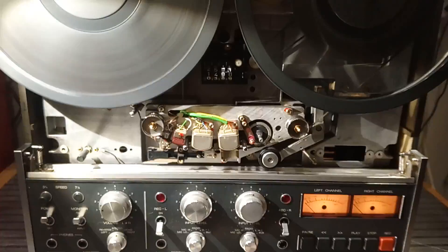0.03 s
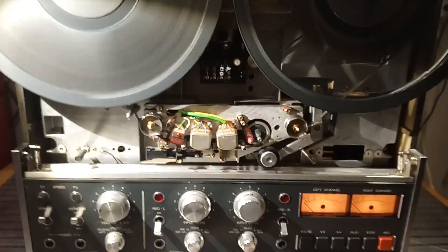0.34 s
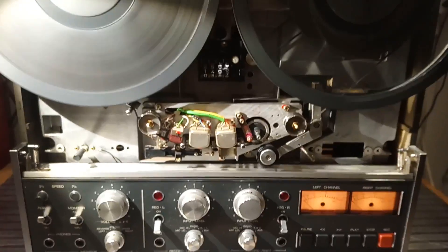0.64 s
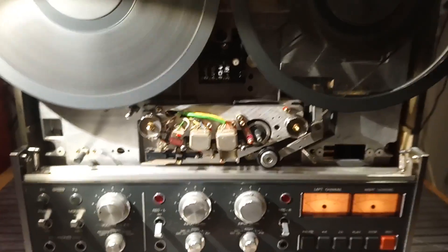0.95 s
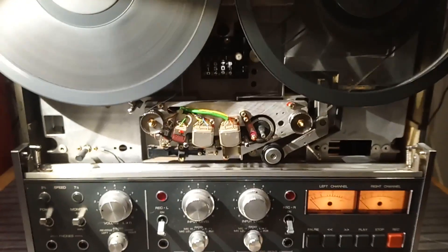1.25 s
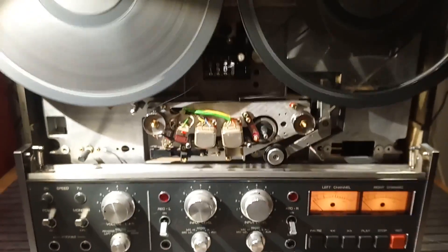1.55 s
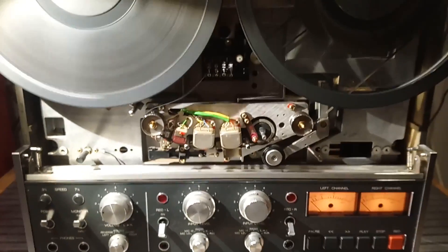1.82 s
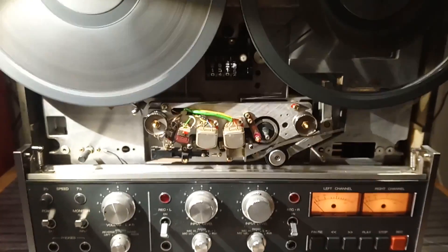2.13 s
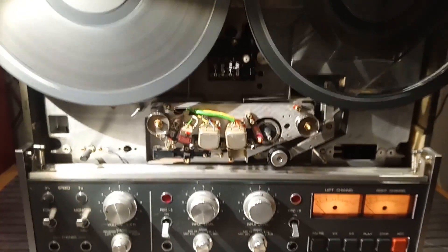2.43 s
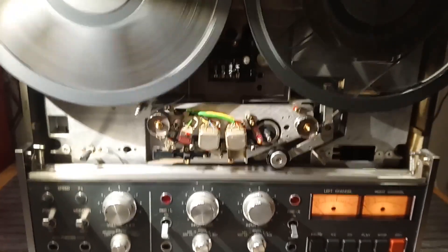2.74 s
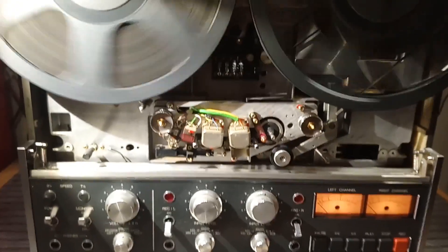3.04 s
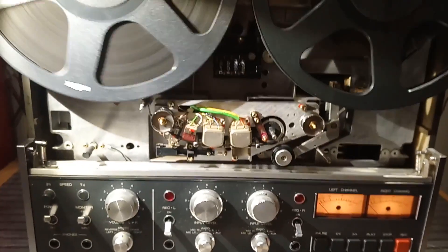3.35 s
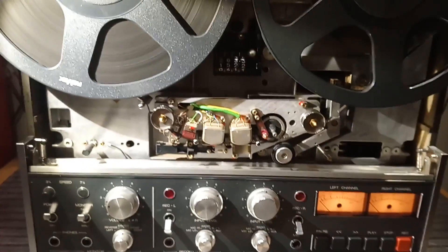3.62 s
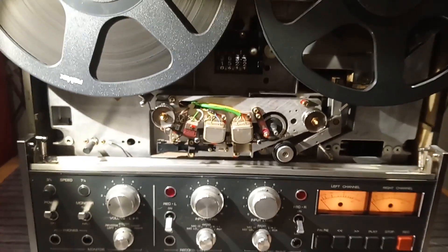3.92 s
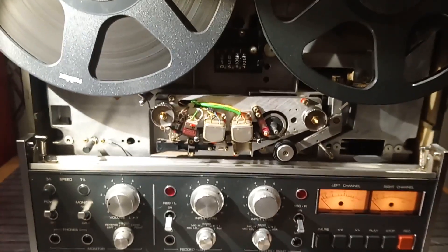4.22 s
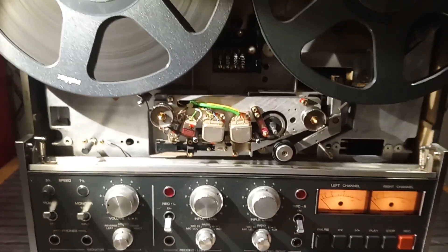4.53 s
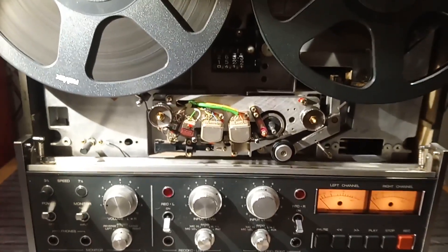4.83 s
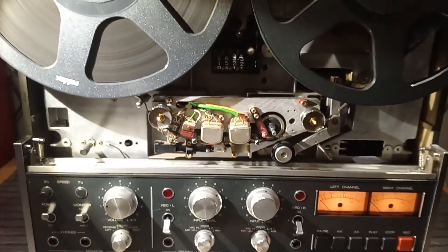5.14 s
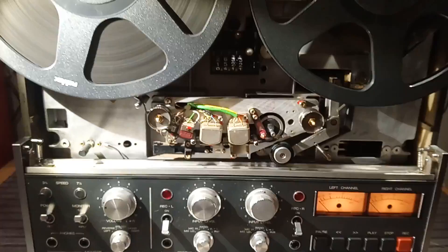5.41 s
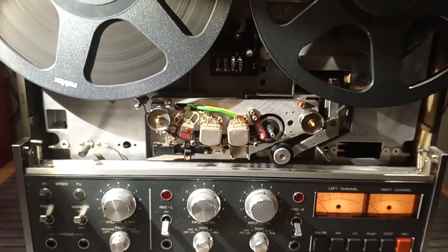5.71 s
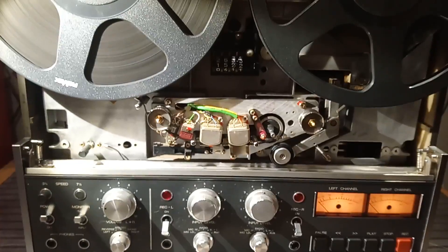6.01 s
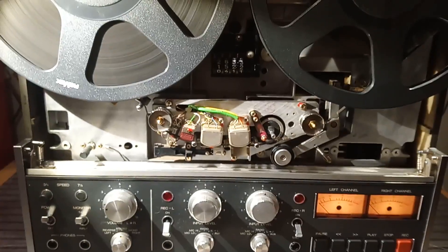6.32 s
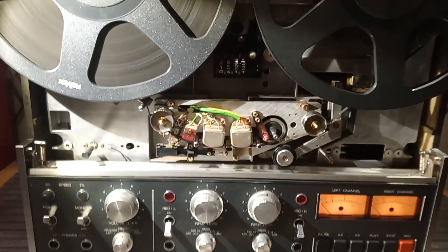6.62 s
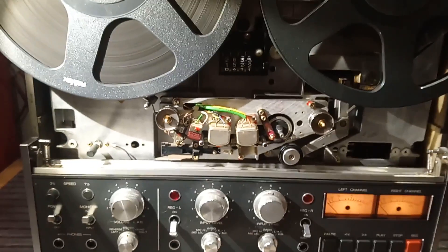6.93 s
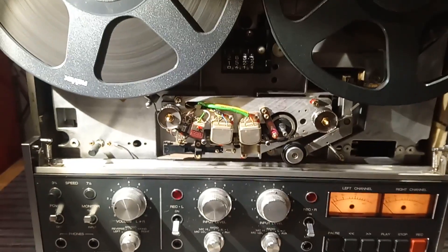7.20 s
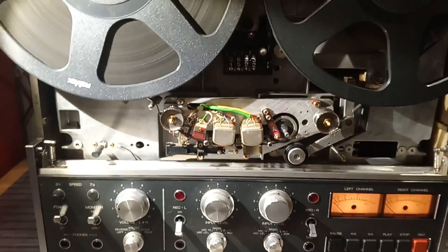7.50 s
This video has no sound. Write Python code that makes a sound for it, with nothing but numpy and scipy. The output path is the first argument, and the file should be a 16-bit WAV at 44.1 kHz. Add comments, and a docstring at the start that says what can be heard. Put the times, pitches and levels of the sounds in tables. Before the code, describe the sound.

Tape hisses through fast spinning reels until a sharp mechanical clunk; the reels brake to a halt, a metal arm clacks, and faint hum remains.

```python
"""Tape hisses as an open-reel machine winds at speed; the reels fan the air and the spooling motors throb.
A splice ticks past. The stop key snaps, solenoids and levers clatter, each impact exciting damped modes,
and the brakes drag with a thin ring of friction. Slack tape scrapes as the reels halt, a tension arm
clacks home, and only the capstan motor and the transformer hum on in a small room."""
import sys
import numpy as np
from scipy import signal
from scipy.fft import rfft, irfft
from scipy.io import wavfile
from scipy.ndimage import uniform_filter1d

SR = 44100
rng = np.random.default_rng(int(sys.argv[2]) if len(sys.argv) > 2 else 0)


def store_wav(level_fs):
    """Save 16-bit WAV to argv[1]."""
    pcm = np.round(np.clip(np.atleast_2d(level_fs), -1, 1) * 32767)
    wavfile.write(sys.argv[1], SR, pcm.T.astype(np.int16))


N = 333396
TIME, FREQ = np.arange(N) / SR, np.fft.rfftfreq(N, 1 / SR)
MAINS_HZ = 49.965
SPLICE_S, SLACK_S, POWER_OFF_S = .8406, 2.025, 2.14


def amp(db):
    """Amplitude ratio of a level in decibels."""
    return 10 ** (np.asarray(db) / 20)


def unit(x):
    """Normalisation to rms 1."""
    return x / np.sqrt(np.mean(x ** 2) + 1e-20)


def read(points, hz=FREQ):
    """Interpolation along a logarithmic frequency axis."""
    f, value = np.transpose(points)
    return np.interp(np.log(hz + 1), np.log(f + 1), value)


def curve(rows, column):
    """Amplitude envelope from a column of levels over time."""
    rows = np.asarray(rows)
    return amp(np.interp(TIME, rows[:, 0], rows[:, column]))


def release(s, fall):
    """Unity until time s, then exponential decay with time constant fall."""
    return np.exp(-np.maximum(TIME - s, 0) / fall)


def swell(s, width):
    """Gaussian pulse of height 1 centred on time s."""
    return np.exp(-((TIME - s) / width) ** 2)


def add(mix, s, sound):
    """Superposition of a sound starting at time s."""
    part = mix[..., round(s * SR):][..., :sound.shape[-1]]
    part += sound[..., :part.shape[-1]]


def drift(cutoff_hz):
    """Low-pass random fluctuation of rms 1."""
    slow = TIME[::32]
    hz = np.fft.rfftfreq(len(slow), slow[1])
    spectrum = rfft(rng.standard_normal(len(slow))) / (1 + (hz / cutoff_hz) ** 4)
    return np.interp(TIME, slow, unit(irfft(spectrum, len(slow))))


# Coherence of the two channels: f/Hz, correlation coefficient
COHERENCE = [(50, 0.3), (250, 0.7), (1000, 0.33), (2000, 0.17), (4000, 0.03), (15000, 0)]
def noise(gain):
    """Partially coherent noise in two channels, with spectral shape gain; their mean has rms 1."""
    a, b = rfft(rng.standard_normal((2, N)))
    same = read(COHERENCE)
    pair = irfft(np.array([a, same * a + np.sqrt(1 - same ** 2) * b]) * gain, N)
    return pair / pair.mean(0).std()


def uneven_friction(pair, patch_db, lift_db=lambda hz, s: 0):
    """Friction catches at shifting pitches, modulating noise in patches of about 200 Hz by 40 ms."""
    hz, s, spectra = signal.stft(pair, SR, nperseg=512, noverlap=384)
    patches = uniform_filter1d(rng.standard_normal(spectra.shape[1:]), size=3, axis=0)
    patches = unit(uniform_filter1d(patches, size=14, axis=1))
    gain = amp(patch_db * patches + lift_db(hz[:, None], s))
    out = signal.istft(spectra * gain, SR, nperseg=512, noverlap=384)[1][:, :N]
    return out / out.mean(0).std()


# Path of the tape-edge resonance: t/s, f/Hz, gain/dB
EDGE_PATH = [(.3, 5250, 6), (.6, 5370, 0), (1.05, 5330, 6), (1.2, 5230, -2.5), (1.35, 4570, 5.5),
             (1.55, 4370, 5), (2.0, 4570, 1)]
def edge_resonance(hz, s, width_hz=260):
    """The tape edge sings against a guide: a wandering resonance, as gain in dB over pitch and time."""
    at, centre, lift = np.transpose(EDGE_PATH)
    return np.interp(s, at, lift) / (1 + ((hz - np.interp(s, at, centre)) / width_hz) ** 2)


# Envelopes of the winding: t/s, relative hiss level/dB, relative rush level/dB
WINDING_LEVELS = [(0.4, -45, -56.5), (0.492, -46.5, -59.5), (0.8, -45.5, -60), (0.872, -44, -57.5),
                  (1.584, -46, -61), (1.878, -47, -62), (2.0, -47, -60.5)]
# Spectrum of tape on the guides: f/Hz, relative level/dB
HISS_SPECTRUM = [(650, -38.5), (1100, -18.5), (1270, -7.5), (1590, -20), (1850, -8), (2260, -13),
                 (3090, -7.5), (3940, -2.5), (5380, -0.5), (6570, -1), (8290, -12), (10900, -14),
                 (13700, -13.5), (14900, -1), (15600, -12)]
# Spectrum of air and bearings: f/Hz, relative level/dB
RUSH_SPECTRUM = [(25, -39.5), (55, -14.5), (100, -10), (150, -4.5), (230, -3), (300, -7.5), (380, -8.5),
                 (520, -5), (760, -10.5), (950, -6), (1100, -13.5), (1270, -9), (1900, -16.5), (3000, -44)]
def winding(reel_hz=11.2, sway_db=.5, spoke_db=.97, flutter_db=.13, wander_db=.68, gust_db=1.33):
    """Friction noise of tape, amplitude-modulated by the three-spoked reels, which also stir the air."""
    angle = 2 * np.pi * np.cumsum(reel_hz * (1 + .0294 * drift(2))) / SR
    sway = sway_db * (np.cos(angle) + np.cos(2 * angle)) + spoke_db * np.cos(3 * angle)
    tape = uneven_friction(noise(amp(read(HISS_SPECTRUM))), patch_db=2.5, lift_db=edge_resonance)
    tension = .15 + .83 * release(SLACK_S, .034)
    modulation = amp(1.5 + sway + flutter_db * drift(59.8) + wander_db * drift(10))
    hiss = tape * curve(WINDING_LEVELS, 1) * tension * modulation
    stir_db = 5 * (TIME > SPLICE_S) * release(SPLICE_S, .12)  # the splice briefly stirs the reels
    air = noise(amp(read(RUSH_SPECTRUM)))
    rush = air * curve(WINDING_LEVELS, 2) * amp(2.5 + stir_db + gust_db * drift(22))
    return (hiss + rush) * release(POWER_OFF_S, .037)


# Motor load, heard in the sixth harmonic: t/s, level/dB
MOTOR_LOAD = [(.4, -52), (.95, -51), (1.3, -55.5), (1.55, -56), (1.85, -50), (2.14, -51.5)]
# Other mains harmonics: harmonic number, level/dB
MOTOR_HARMONICS = [(2, -65.5), (4, -66.5), (8, -70.5), (10, -69.5)]
def spooling_motors(beat_hz=10.58, beat_peak_s=.418, depth=.7, whirr_db=-62, whirr_hz=378):
    """Mains harmonics; the sixth beats as the rotor slips against the field, until the power is cut."""
    mains = 2 * np.pi * MAINS_HZ * TIME
    beat = 1 + depth * np.cos(2 * np.pi * beat_hz * (TIME - beat_peak_s))
    throb = curve(MOTOR_LOAD, 1) * beat * np.sin(6 * mains + .15 * drift(25))
    hum = sum(amp(db + 1.4 * drift(5)) * np.sin(order * mains) for order, db in MOTOR_HARMONICS)
    whirr = amp(whirr_db) * noise(1 / (1 + ((FREQ - whirr_hz) / 22) ** 2))
    return np.sqrt(2) * (throb + hum + whirr) * release(POWER_OFF_S, .019)


# Partials of the capstan motor: f/Hz, relative level/dB, modulation depth
CAPSTAN_PARTIALS = [(46.4, -89, 0.3), (151, -77.5, .7), (198, -73.5, .3), (251, -77.5, .3),
                    (290, -84.5, 0.63), (343, -87.5, 0.38), (437, -91, .3)]
# Swells of the low hum: t/s, width/s, gain/dB
CAPSTAN_SWELLS = [(4.48, 0.096, 9), (5.07, .06, 7.5), (7.52, .15, 15)]
def capstan_motor(trim_db=-2, swell_hz=150, swell_width_hz=45):
    """Partials sound throughout with random amplitude and phase modulation; the low ones swell."""
    lift_db = sum(db * swell(s, width) for s, width, db in CAPSTAN_SWELLS)
    out = np.zeros(N)
    for hz, db, depth in CAPSTAN_PARTIALS:
        waver = 1 + depth * (drift(2.5) + 1j * drift(3.1))
        tone = unit((waver * np.exp(2j * np.pi * hz * TIME)).imag)
        out += tone * amp(trim_db + db + lift_db / (1 + ((hz - swell_hz) / swell_width_hz) ** 2))
    return out


def transformer(level_db=-68):
    """A transformer vibrates at twice the mains frequency."""
    return np.sqrt(2) * amp(level_db + .7 * drift(3)) * np.sin(2 * np.pi * 2 * MAINS_HZ * TIME)


# Spectrum of the background: f/Hz, relative level/dB
AMBIENT_SPECTRUM = [(20, -22.5), (50, -10.5), (100, -8.5), (200, -7.5), (550, -16), (1800, -21.5),
                    (2450, -21.5), (2720, -19), (3000, -22), (6200, -22.5), (8100, -33), (8900, -29.5),
                    (13200, -37), (15100, -21)]
def ambient_noise(level_db=-67.5):
    """Nearly stationary broadband noise, strongest in the bass."""
    return amp(level_db + .3 * drift(2.01)) * noise(amp(read(AMBIENT_SPECTRUM)))


# Spectrum of the splice tick: f/Hz, relative level/dB
SPLICE_SPECTRUM = [(500, -31), (1200, 1), (3000, -13), (4700, 10), (6500, -3), (8500, -35), (15000, -28)]
def splice(left_db=-17.5, right_lower_db=20, decay_s=.001):
    """A passing splice gives one dry transient; a level difference places it on the left."""
    t = TIME[:SR // 50]
    tick = noise(amp(read(SPLICE_SPECTRUM)))[:, :len(t)] * np.exp(-t / decay_s)
    out = np.zeros((2, N))
    add(out, SPLICE_S, tick * amp([[left_db], [left_db - right_lower_db]]))
    return out


# Soft low bumps: t/s, duration/s, f/Hz, peak level/dB
LOW_BUMPS = [(.885, 0.049, 74, -52), (2.2, 0.07, 159.6, -41.5), (2.23, .07, 48, -55),
             (2.243, .026, 258, -31), (3.66, .11, 52.1, -64)]
# Stick-slip squeaks: t/s, duration/s, f/Hz, peak level/dB
STICK_SLIP = [(2.1513, .009, 1840, -16), (2.1585, .0135, 1848, -7), (2.662, .023, 1835, -39),
              (2.805, .032, 1836, -44.5), (2.836, .014, 5210, -42), (2.862, .023, 1875, -42.5),
              (3.066, .023, 5470, -41), (3.166, .025, 4750, -34)]
def tone_bursts(rows, wobble):
    """Windowed tones with random frequency modulation of relative depth wobble."""
    out, unsteady = np.zeros(N), 1 + wobble * drift(303)
    for s, length, hz, db in rows:
        t = TIME[:round(length * SR)]
        cycles = hz * np.cumsum(unsteady[round(s * SR):][:len(t)]) / SR
        window = np.sin(np.pi * t / length) ** 1.5
        add(out, s, amp(db) * window * np.sin(2 * np.pi * cycles))
    return out


# Impacts of levers and reels: t/s, crack level/dB, thud level/dB, panel level/dB, panel f/Hz
IMPACTS = [(2.152, -25.5, -39.5, -29.5, 1265), (2.2104, -22, -30, -24.5, 228.4),
           (2.230, -30, -35, -29, 490), (2.2485, -24, -30, -23, 596), (2.3332, -20, -28.5, -21.5, 745),
           (2.348, -45, -38.5, -33.5, 229), (3.175, -37, -39, -41, 520), (3.2155, -34, -37.5, -42, 740)]
# Spectrum of ringing metal: f/Hz, relative level/dB
METAL_SPECTRUM = [(100, -46), (350, -22.5), (750, -7), (1200, -12.5), (1900, -6), (2500, -11.5), (3100, -7),
                  (3800, -10), (4400, -2.5), (5000, -7), (6700, -9), (8600, -25), (13000, -27.5),
                  (15200, -15)]
# Spectrum of the cabinet: f/Hz, relative level/dB
CABINET_SPECTRUM = [(25, -26.5), (60, -14), (130, -5.5), (250, -11), (450, 5.5), (800, 3), (1200, -16.5),
                    (2500, -47)]
def knocks(rise_s=.0011, crack_decay_s=.012, thud_t60=.0633, cabinet_width=.42):
    """Impacts excite dense metal modes and a damped thud: one panel mode amid the cabinet's many."""
    out, t = np.zeros((2, N)), TIME[:SR // 4]
    metal, body = noise(amp(read(METAL_SPECTRUM))), noise(amp(read(CABINET_SPECTRUM)))
    cabinet = body.mean(0) + cabinet_width * (body - body.mean(0))
    onset, damping = 1 - np.exp(-t / rise_s), 1000 ** (-t / thud_t60)
    for s, crack_db, thud_db, panel_db, hz in IMPACTS + rattle():
        now = slice(round(s * SR), round(s * SR) + len(t))
        crack = amp(crack_db) * np.exp(-t / crack_decay_s) * metal[:, now]
        thud = amp(thud_db) * cabinet[:, now] + amp(panel_db) * np.sin(2 * np.pi * hz * t)
        add(out, s, (crack + thud * damping) * onset)
    return out


# Strokes of sliding levers and slack tape: t/s, peak level/dB, rise time/s
SCRAPE_STROKES = [(2.160, -31, 0.014), (3.125, -41.5, 0.025), (3.171, -42, 0.0075)]
def scrapes(tape_db=-5):
    """Sliding friction swells and dies, mixing metal ringing with tape hiss."""
    envelope = np.zeros(N)
    for s, db, rise in SCRAPE_STROKES:
        age = TIME[:SR // 2] / rise
        add(envelope, s, amp(db) * age * np.exp(1 - age))
    metal, tape = noise(amp(read(METAL_SPECTRUM))), noise(amp(read(HISS_SPECTRUM)))
    return envelope * (metal + amp(tape_db) * tape)


# Modes of the stop linkage, brake lever and tension arm: f/Hz, relative level/dB, T60/s
LINKAGE_MODES = [(1212, -14.5, .35), (1421, -6, 0.11), (1813, 0, 0.23), (1850, -8, 0.16),
                 (2540, -14.5, 0.27), (3116, -10, 0.36), (3130, -14.5, 0.24), (4070, -11.5, 0.18),
                 (4360, -19.5, 0.32)]
LEVER_MODES = [(514, -2.5, 0.43), (762, 0, 0.47), (1350, 1, 0.1545), (1810, 4, 0.28), (3020, -5, 0.43),
               (4040, -9, .35), (5000, -4, .15), (6600, -9, 0.18)]
ARM_MODES = [(1140, -28.5, .24), (1370, -33, 1.4), (1805, -10.5, 0.34), (2007, -3.5, 0.15),
             (2320, -21, 0.24), (2635, -26, 0.52), (2830, -22.5, 0.37), (3079, -29, 0.46),
             (4000, -28, 0.22), (6126, -32, .35), (6670, -18.5, 0.14)]
def steel_strike(s, modes, ring_db, crack_db, crack_decay_s, contact_s=.000512):
    """Steel hits its stop: a bright crack, then free vibration of damped modes."""
    out, t = np.zeros((2, N)), TIME[:SR]
    contact = 1 - np.exp(-(t / contact_s) ** 2)
    for hz, db, t60 in modes:
        phase = np.array([[0], [rng.uniform(-.55, 1)]])  # each side receives the mode in its own phase
        envelope = amp(ring_db + db) * contact * 1000 ** (-t / t60)
        add(out, s, envelope * np.sin(2 * np.pi * hz * t + phase))
    bright = amp(read([(300, -50.5), (1200, -24.5), (1800, 8), (4000, 4), (6800, -2.5),
                       (9000, -28), (15000, -34)]))  # f/Hz, relative level/dB
    add(out, s, amp(crack_db) * np.exp(-t / crack_decay_s) * noise(bright)[:, :len(t)])
    return out


def rattle(start_s=2.271, gap_s=.0145, restitution=.69, crack_db=-28, loss_db=3,
           thud_db=-37, panel_db=-30.5, panel_hz=644):
    """Inelastic bounces of a lever, as impact rows: each is sooner and cracks less, over an equal thud."""
    bounces = []
    for k in range(4):
        s = start_s + gap_s * np.sum(restitution ** np.arange(k))
        hz = panel_hz * (1 + .1 * rng.uniform(-.961, 1))
        bounces.append((s, crack_db - loss_db * k, thud_db, panel_db, hz))
    return bounces


# Resonances of the brake bands: f/Hz, half-width/Hz, relative level/dB
BRAKE_RESONANCES = [(960, 48, -15), (1330, 33, -16), (1851, 38, -0.5), (3072, 39, -7), (4330, 100, -10),
                    (4600, 60, -9), (6537, 86, -13)]
# Spectrum of the slowing tape: f/Hz, relative level/dB
SLIDE_SPECTRUM = [(290, -51.5), (500, -25.5), (770, -28.5), (929, -12.5), (1070, -30), (1220, -6.5),
                  (1680, -16.5), (1850, -4.5), (2330, -20), (2980, -12), (4400, -8.5), (6770, -9.5),
                  (8400, -21.5), (13500, -21.5), (15600, -8)]
# The brakes grab and tug the tape: t/s, gain of the tape hiss/dB
BRAKE_GRABS = [(2.678, 5), (2.741, 5), (2.869, 6.5), (2.955, 4.5)]
def brakes(on_s=2.44, off_s=3.2, ring_db=-51.5, slide_db=-44, sag_db_per_s=9.5):
    """Friction on the drums drives the bands' resonances while the tape slows; each grab lifts both."""
    since = TIME - on_s
    bite = np.exp(np.minimum(since, 0) / .16)
    sag_db = sag_db_per_s * np.maximum(since, 0)
    grab_db = sum(db * swell(s, .02) for s, db in BRAKE_GRABS)
    power = sum(amp(db) ** 2 / (1 + ((FREQ - hz) / width) ** 2) ** 2
                for hz, width, db in BRAKE_RESONANCES)
    ring = noise(np.sqrt(power)) * amp(ring_db - sag_db + .2 * grab_db + 1.5 * drift(25))
    tape = uneven_friction(noise(amp(read(SLIDE_SPECTRUM))), patch_db=3)
    tape *= amp(slide_db - sag_db + grab_db + drift(50))
    return bite * (ring * release(off_s, .075) + tape * release(off_s, .15))


# Contacts as reels and guides settle: t/s, relative level/dB
SETTLING = [(3.534, -48.5), (3.687, -58.5), (6.230, -70), (6.279, -69), (6.475, -67), (6.530, -67)]
# Spectrum of a contact: f/Hz, relative level/dB
TICK_SPECTRUM = [(500, -30), (1900, -2), (3200, -15), (4900, 6), (6200, -1), (8000, -35), (15000, -42)]
def settling_ticks(rise_s=.0008, decay_s=.006):
    """Impacts of small parts, too light to excite the cabinet."""
    envelope, t = np.zeros(N), TIME[:SR // 8]
    for s, db in SETTLING:
        add(envelope, s, amp(db) * np.exp(-t / decay_s) * (1 - np.exp(-t / rise_s)))
    return envelope * noise(amp(read(TICK_SPECTRUM)))


def rustle(at_s=7.25, width_s=.16, peak_db=-75, low_hz=300, high_hz=6500):
    """Band-limited noise under a Gaussian envelope: one faint rustle in the room."""
    attenuation = (1 + (low_hz / (FREQ + 1)) ** 4) * (1 + (FREQ / high_hz) ** 10) * (1 + FREQ / 900)
    return amp(peak_db) * swell(at_s, width_s) * noise(1 / np.sqrt(attenuation))


# Reverberation time of the room: f/Hz, T60/s
ROOM_T60 = [(150, 0.68), (600, 0.28), (2000, 0.3), (6000, 0.28), (14000, 0.11)]
def reverberation(pair, first_echo_s=.004):
    """Convolution with sparse, partially coherent reflections; each band decays at its own rate."""
    size = SR // 2
    taps = rng.choice([-1., 1.], (2, size)) * (rng.random((2, size)) < .1) * (TIME[:size] > first_echo_s)
    hz, t, (a, b) = signal.stft(taps, SR, nperseg=256)
    same = read(COHERENCE, hz)[:, None]
    spectra = np.array([a, same * a + np.sqrt(1 - same ** 2) * b])
    tail = signal.istft(spectra * 1000. ** (-t / read(ROOM_T60, hz)[:, None]), SR)[1]
    return signal.fftconvolve(pair, tail / np.linalg.norm(tail[0]), axes=1)[:, :N]


# Balance of the running deck, the impacts and the background: f/Hz, left minus right level/dB
DECK_BALANCE = [(60, 0), (92, -3), (140, -3.5), (210, -0.5), (330, -1.0), (500, -3.5), (770, -1.0),
                (1170, -1), (1790, -1.5), (2740, -0.5), (4190, 0.5), (6410, -4.5), (9810, -20),
                (15000, -13.5)]
IMPACT_BALANCE = [(60, -2.5), (120, -3), (240, 1.5), (480, -1.5), (950, -1), (1890, -2.5), (3770, 0.5),
                  (7520, -10), (15000, -16)]
AMBIENT_BALANCE = [(60, -7.5), (130, -3.5), (290, -1.5), (640, -1), (1410, -1), (3100, -0.5), (6820, -2.0),
                   (15000, -3.5)]
def pan(pair, balance):
    """Constant-power panning, frequency by frequency."""
    lean = amp(np.outer([.5, -.5], read(balance)))
    return irfft(rfft(pair) * lean / np.sqrt(np.mean(lean ** 2, axis=0)), N)


def scene():
    """Superposition of the running deck, its impacts with their reflections, and the quiet room."""
    clatter = knocks() + scrapes() + settling_ticks()
    clatter += steel_strike(2.3338, LEVER_MODES, ring_db=-46.5, crack_db=-34, crack_decay_s=.013)
    linkage = steel_strike(2.1625, LINKAGE_MODES, ring_db=-20.5, crack_db=-26, crack_decay_s=.009)
    arm = steel_strike(3.3836, ARM_MODES, ring_db=-28.5, crack_db=-35.5, crack_decay_s=.015)
    squeaks = tone_bursts(STICK_SLIP, wobble=.012)
    echoes = reverberation(amp(-6) * clatter + amp(-15) * linkage + amp(-5.5) * arm + amp(-13.5) * squeaks)
    hits = clatter + linkage + arm + squeaks + echoes + tone_bursts(LOW_BUMPS, wobble=.046)
    running = winding() + spooling_motors() + brakes() + capstan_motor() + transformer()
    ambient = ambient_noise() + rustle()
    return pan(running, DECK_BALANCE) + pan(hits, IMPACT_BALANCE) + pan(ambient, AMBIENT_BALANCE) + splice()


def record(dry, start_s=.11, open_s=.044, climb_db_per_s=54.5, cutoff_hz=15650):
    """A fade opens quickly and climbs to full level; a low-pass filter limits the bandwidth."""
    since = TIME - start_s
    fade = np.clip(since / open_s, 0, 1) * amp(np.minimum(-15 + climb_db_per_s * since, 0))
    lowpass = signal.firwin(511, cutoff_hz, window=("kaiser", 9), fs=SR)
    return signal.oaconvolve(dry * fade, lowpass[None], "same")


dry = scene()
out = record(dry)
store_wav(out)
```